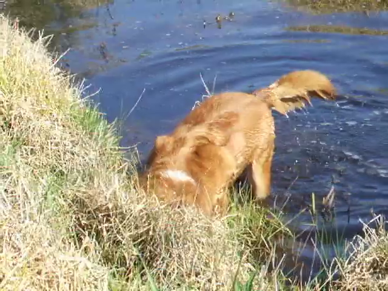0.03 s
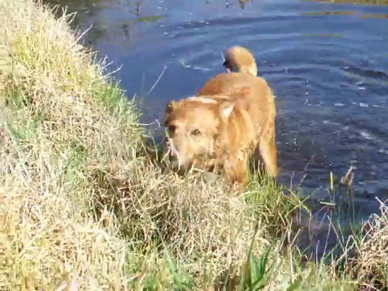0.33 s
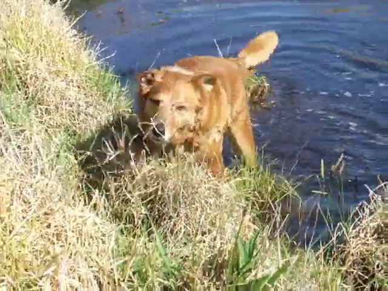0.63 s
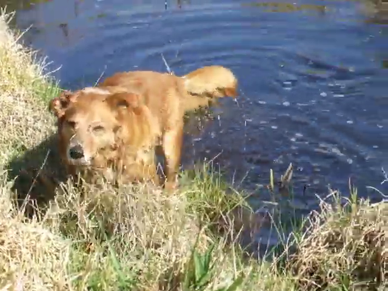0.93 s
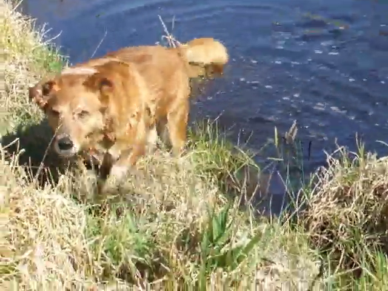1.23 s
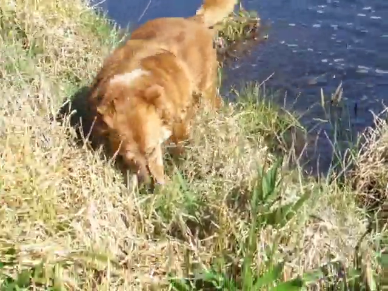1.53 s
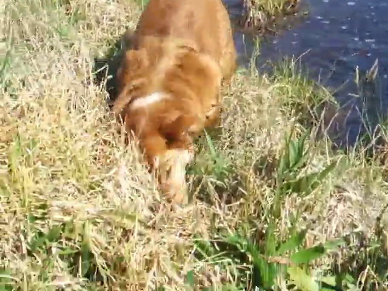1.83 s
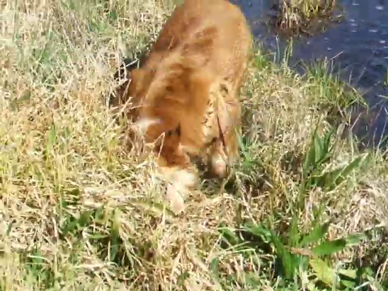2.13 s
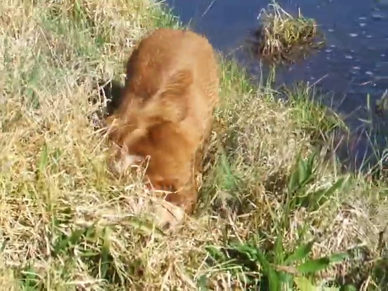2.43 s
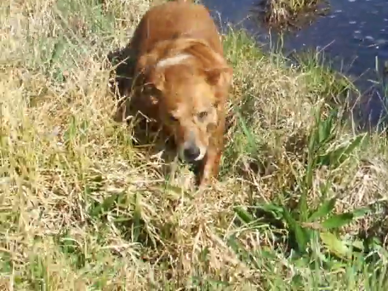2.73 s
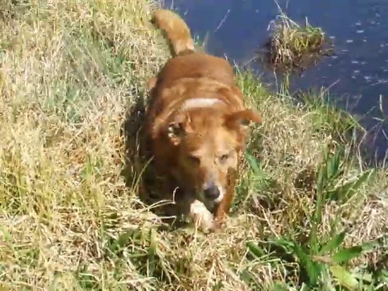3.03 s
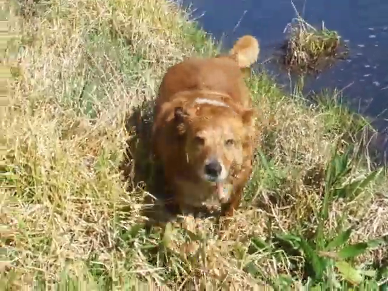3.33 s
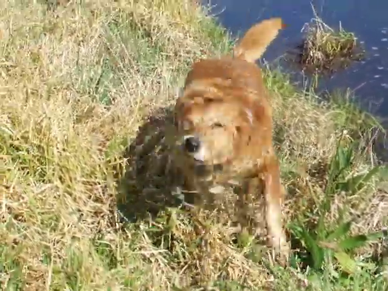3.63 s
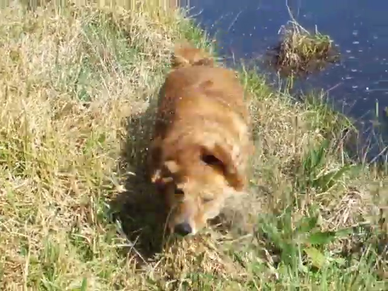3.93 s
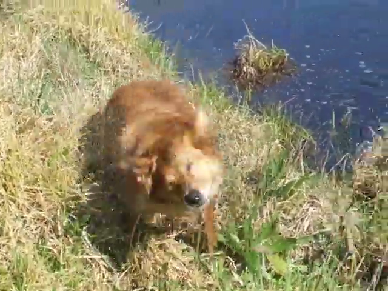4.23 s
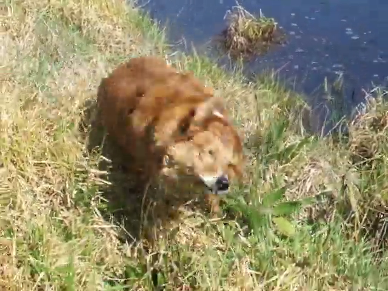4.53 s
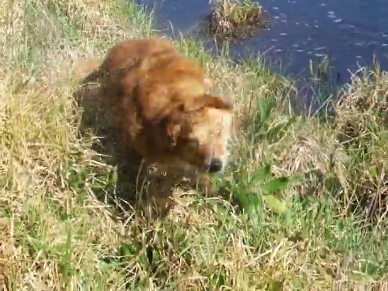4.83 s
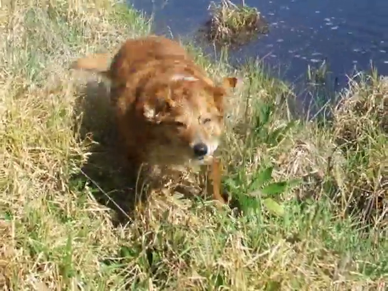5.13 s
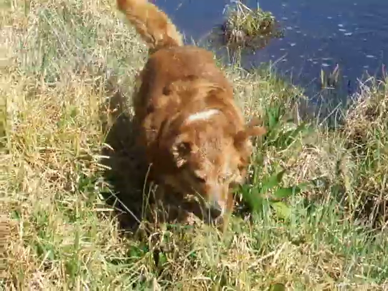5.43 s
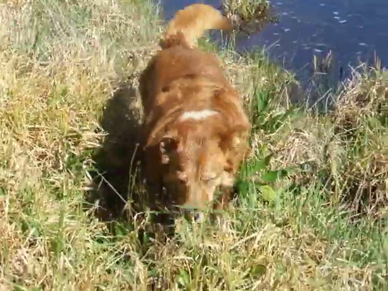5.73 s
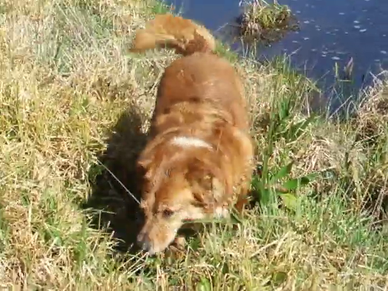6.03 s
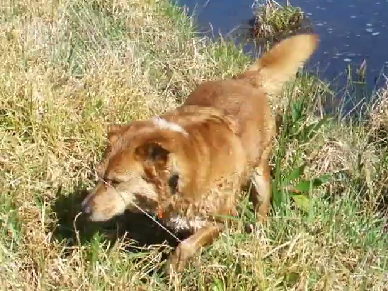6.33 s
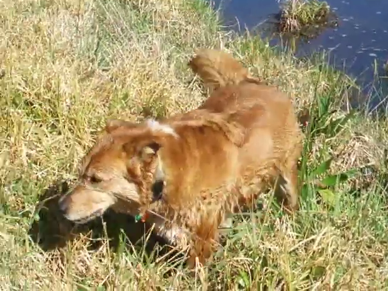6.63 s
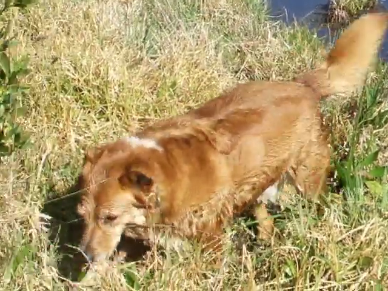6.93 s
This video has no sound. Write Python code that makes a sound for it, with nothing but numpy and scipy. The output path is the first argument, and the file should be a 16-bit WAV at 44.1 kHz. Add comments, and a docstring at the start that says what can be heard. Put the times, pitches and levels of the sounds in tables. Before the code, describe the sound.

A wet dog sloshes out of a pond, rustles through dry grass and shakes itself with rapid ear slaps while frogs call.

```python
"""A breeze, far traffic, a motor and a camera's faint whine lie under a pond where frogs call throughout.
First a wet dog sloshes out of the water and pushes through dry grass, snapping stalks; a far bird warbles.
From about 3.5 seconds it shakes itself: an ear slaps about five times a second, the other ear lands
in between amid smaller wet flaps, and spray falls on the grass.
Last, a tiny frog creaks three times as the dog moves on."""
import sys
import numpy as np
from scipy import signal
from scipy.fft import rfft, irfft
from scipy.io import wavfile
from scipy.ndimage import uniform_filter1d

SR = 44100
rng = np.random.default_rng(int(sys.argv[2]) if len(sys.argv) > 2 else 0)


def file_out(sig):
    """Save sig as 16-bit WAV at sys.argv[1]."""
    # one column per channel
    cols = np.atleast_2d(sig).T
    # limit, then scale
    lim = np.clip(cols, -1, 1)
    pcm = np.round(lim * 32767).astype(np.int16)
    wavfile.write(sys.argv[1], SR, pcm)


N = 316638
TIME = np.arange(N) / SR
FIRST_TWIST_S = 3.55

# The tone of rustling grass. Each row: frequency in Hz, level in dB.
GRASS_TONE = [(250, -24.5), (600, -15.5), (1200, -10.5), (2100, -0.5), (2700, -2), (3500, 1), (4500, 2.5),
              (6300, 2.5), (8000, -4.5)]
# The tone of a sharp crack. Each row: frequency in Hz, level in dB.
CRACK_TONE = [(600, -23.5), (1400, -24.5), (2200, 2), (3500, 10), (5000, -3.5), (7000, 5.5), (8200, -4.5)]
# Ear slaps. Each row: start in seconds, level in dB, pitch of the trapped air in Hz, delay of the
# ear tip in seconds, tip and water crack in dB against the slap, level of the flaps after it in dB.
EAR_SLAPS = [(3.6379, -26.5, 1780, 0.00187, 0.5, -19, -30.5), (3.804, -20, 2020, 0.00084, -2.5, -7.5, -40),
             (3.9959, -20, 1980, .0016, -12, -8, -30), (4.1826, -16.5, 2140, 0.0012, -6.5, -25, -24),
             (4.3678, -24.5, 1810, .0016, -8, -7, -34), (4.556, -24.5, 2300, .0014, -24, -7.5, -28.5),
             (4.7385, -14.5, 1950, 0.000974, -6, -12.5, -30), (4.9124, -17.5, 2020, .0023, 1, -9, -34.5),
             (5.0982, -17, 1850, 0.0048, -6.5, -28, -52)]


def undb(db):
    """Turn decibels into a number to multiply by."""
    return 10 ** (np.asarray(db) / 20)


def unit(x):
    """Scale a sound to an average strength (rms) of 1."""
    return x / np.sqrt(np.mean(x ** 2))


def curve(rows):
    """Join (seconds, value) rows by straight lines."""
    return np.interp(TIME, *np.transpose(rows))


def colour(x, points):
    """Shape a sound's tone by (Hz, dB) rows, at strength 1."""
    hz, db = np.transpose(points)
    bins = np.maximum(np.fft.rfftfreq(len(x), 1 / SR), 1)
    gain = undb(np.interp(np.log(bins), np.log(hz), db))
    return unit(irfft(rfft(x) * gain, len(x)))


def walk(rate):
    """Smooth wandering of strength 1, through `rate` random values a second."""
    k = max(int(SR / rate), 1)
    steps = np.repeat(rng.standard_normal(N // k + 1), k)
    return unit(uniform_filter1d(uniform_filter1d(steps, k), k)[:N])


def add(out, s, x):
    """Mix a short sound in at s seconds."""
    i = int(np.clip(s * SR, 0, N - 1))
    out[i:i + len(x)] += x[:N - i]


def fade(t60):
    """A fade, a fifth of a second long, that drops 60 dB every t60 seconds."""
    return np.exp(-np.log(1000) * TIME[:SR // 5] / t60)


def ring(hz, modes):
    """Tones dying away after one blow, from (multiple of the pitch, dB, fade time) rows."""
    t = TIME[:SR // 5]
    return sum(undb(db) * fade(t60) * np.sin(2 * np.pi * hz * ratio * t) for ratio, db, t60 in modes)


def crackle(rate, spread_db):
    """About `rate` random clicks a second, mostly weak and a few strong."""
    size = undb(spread_db * np.minimum(rng.exponential(size=N), 5))
    return unit((rng.random(N) < rate / SR) * size * rng.choice([-1, 1], N))


def swells(rows):
    """Bell-shaped swells from (peak time, dB, length) rows."""
    return np.sqrt(sum(undb(db) ** 2 * np.exp(-np.minimum((2 * (TIME - s) / length) ** 2, 40))
                       for s, db, length in rows))


def air(level_db=-52):
    """Open air: a low rumble and soft hiss that waver a little."""
    # Each row: frequency in Hz, level in dB.
    air_tone = [(15, -32), (25, -3), (44, 1), (104, -0.5), (142, -5.5), (219, -20), (266, -16),
                (442, -20.5), (770, -14), (934, -18), (2070, -17), (2390, -29.5), (3360, -21.5),
                (6920, -20.5), (8000, -20), (10400, -47.5), (17600, -120)]
    return colour(rng.standard_normal(N), air_tone) * undb(level_db + walk(5.5))


def breeze():
    """Moving air makes a low rush that swells and eases."""
    # Each row: time in seconds, level in dB.
    strength = [(0.0, -48.5), (0.86, -50.5), (2.54, -47.5), (4.6, -46.5), (5.6, -50.5), (7.18, -50)]
    tone = [(20, -16.5), (60, -1), (160, -1.5), (228, -1), (265, -7.5), (480, -9.5), (1200, -9),
            (4000, -18.5)]
    return colour(rng.standard_normal(N), tone) * undb(curve(strength))


def traffic(gain_db=-3):
    """Far tyres blend into one soft roar."""
    # Each row: time in seconds, level in dB.
    loudness = [(0.0, -59.5), (2.0, -56), (3.3, -54.5), (4.2, -58), (5.52, -67.5), (7.18, -66.5)]
    tone = [(300, -30.5), (560, -11.5), (760, 0), (950, -12), (1300, -11.5), (3000, -39)]
    return colour(rng.standard_normal(N), tone) * undb(curve(loudness) + gain_db)


def motor(hz=96.9, level_db=-54.5):
    """A far motor hums unsteadily, fading out and in."""
    phase = 2 * np.pi * np.cumsum(hz + 1.61 * walk(20)) / SR
    flutter_db = 2.6 * walk(24)
    drift_db = curve([(0, 2), (1, 0), (2, -3), (4.5, -5.5), (5.3, -2.2), (7.18, -1.5)])
    return np.sqrt(2) * np.sin(phase) * undb(level_db + drift_db + flutter_db)


def whine():
    """A camera gives off four faint, high, steady tones."""
    # Each row: pitch in Hz, level in dB.
    tones = [(7852, -65), (7882, -66), (8118, -69), (8148, -70)]
    return sum(np.sqrt(2) * undb(db) * np.sin(2 * np.pi * hz * TIME) for hz, db in tones)


def chorus(level_db=-60, hz=3380, sharpness=5):
    """Many tiny frogs far away merge into a thin, flickering ring."""
    peak = signal.iirpeak(hz, sharpness, fs=SR)
    band = unit(signal.lfilter(*peak, signal.lfilter(*peak, rng.standard_normal(N))))
    drift_db = curve([(0, -9), (1.2, 1.5), (4.5, 0), (5.4, -4), (7.18, -11)])
    return band * undb(level_db + drift_db + 2 * walk(20))


def bird(hz=3180, waver_hz=110, blur_hz=130):
    """A bird's thin warble, blurred by distance."""
    # Each row: peak time in seconds, level in dB, length in seconds.
    notes = [(1.22, -46.5, 0.029), (1.3, -51, 0.051), (1.54, -53.5, 0.13)]
    pitch = hz + waver_hz * walk(35) + blur_hz * walk(600)
    return np.sqrt(2) * np.sin(2 * np.pi * np.cumsum(pitch) / SR) * swells(notes)


def froglet(low_hz=2790, high_hz=3055.5):
    """A tiny frog creaks: four soft-edged clicks a call ring its throat pouch."""
    # Each row: start in seconds, level in dB.
    calls = [(5.498, -34), (6.174, -35), (6.845, -33.5)]
    # Each value: seconds from the start of a call to a click.
    click_delays = [0, .034, .077, .106]
    pouch = ring(low_hz, [(1, 3, 0.012)]) + ring(high_hz, [(1, 0, 0.014)])
    click = pouch * (1 - fade(0.0092))
    out = np.zeros(N)
    for s, db in calls:
        for delay in click_delays:
            add(out, s + delay, undb(db) * click)
    return out


def frog(gain_db=3, lead_s=.005, length_s=0.021, jitter=.3, echo_db=-17, echo_t60=0.11):
    """Uneven throat pulses ring a frog's pouch with a hollow knock; the banks echo it weakly."""
    # Each row: time in seconds, level in dB, pitch in Hz.
    knocks = [(0.162, -39.5, 846), (0.405, -34, 870), (1.037, -37.5, 933), (1.121, -42, 963),
              (1.525, -38.5, 892), (1.748, -38.5, 885), (2.697, -33, 867), (3.297, -39, 896),
              (3.349, -42, 890), (3.993, -38, 895), (4.433, -37.5, 943), (4.923, -33, 875),
              (5.938, -39, 918), (6.047, -47, 926), (6.357, -40.5, 960), (6.496, -42, 894),
              (6.94, -36, 935)]
    # The pouch's tones. Each row: multiple of the pitch, level in dB, fade time in seconds.
    pouch_tones = [(.53, -15, .035), (1.002, 21.5, 0.019), (1.24, -3.5, 0.02), (2.1, -16.5, 0.009)]
    out = np.zeros(N)
    for s, db, hz in knocks:
        slip, rough_db = rng.standard_normal((24, 2)).T
        throat = np.zeros(SR // 5)
        for t, size in zip((np.arange(24) + jitter * slip) / hz, undb(rough_db)):
            throat[int(max(t, 0) * SR)] += size * np.sin(np.pi * np.clip(t / length_s, 0, 1))
        call = signal.fftconvolve(np.gradient(throat), ring(hz, pouch_tones))[:SR // 5]
        add(out, s - lead_s, undb(db + gain_db) * call / np.abs(call).max())
    banks = rng.standard_normal(SR // 5) * fade(echo_t60)
    return out + undb(echo_db) * signal.fftconvolve(out, banks / np.linalg.norm(banks))[:N]


def bubble(hz, t60, rise=2.0):
    """A bubble rings and rises in pitch as it surfaces."""
    t = TIME[:SR // 5]
    return fade(t60) * (1 - fade(0.0073)) * np.sin(2 * np.pi * hz * (t + rise * t ** 2 / 2))


def water(slosh_db=-2, fizz_db=-3, scatter_db=3):
    """Wading paws slosh and stir up small bubbles; a few louder drips stand out."""
    # Each row: frequency in Hz, level in dB.
    slosh_tone = [(400, -36), (900, -4.5), (1700, 0.5), (2400, -1.5), (3500, -3), (8000, -19)]
    # Paws in water and mud. Each row: peak time in seconds, level in dB, length in seconds.
    steps = [(0.199, -39.5, 0.00744), (0.293, -47, 0.12), (0.408, -46.5, 0.06), (.85, -48, 0.043),
             (0.964, -38, 0.011), (1.002, -36, 0.0071), (1.04, -44, 0.036), (1.133, -42.5, 0.062),
             (6.316, -46, 0.093)]
    # Each row: start in seconds, level in dB, starting pitch in Hz, fade time in seconds.
    drips = [(.018, -33, 3550, 0.086), (.09, -34, 2530, 0.022), (.195, -21.5, 1810, 0.0095),
             (.308, -37, 2330, .03), (1.016, -30, 2070, 0.018), (1.096, -29, 1750, 0.019),
             (2.34, -36, 1575, 0.071), (4.516, -36.5, 1620, 0.068), (5.099, -22.5, 4680, 0.033),
             (5.245, -31, 640, 0.015)]
    out = colour(crackle(rate=2000, spread_db=4), slosh_tone) * swells(steps) * undb(slosh_db)
    for s, db, length in steps:
        for when, pitch, size in rng.standard_normal((9, 3)):
            hz = 1900 * 2 ** (pitch / 2)
            pop = bubble(hz, t60=28 / hz)  # small, high bubbles die away sooner
            add(out, s + length * when / 3, undb(db + fizz_db + scatter_db * size) * pop)
    for s, db, hz, t60 in drips:
        add(out, s, undb(db) * bubble(hz, t60))
    return out


def pushes(bend_s=0.037, spring_back_s=0.041):
    """How hard the grass moves as legs and muzzle bend it, drag through and let it spring back."""
    # Grass stirring between pushes. Each row: time in seconds, level in dB.
    stirring = [(0, -51), (.55, -55.5), (1.2, -51), (3.0, -51.5), (5.1, -50.5), (6.1, -66), (6.7, -63),
                (7.18, -50)]
    # Each row: start in seconds, level in dB, length in seconds.
    shoves = [(0.107, -47, 0.23), (.63, -48, 0.18), (0.773, -44.5, .17), (1.0, -44, 0.037),
              (1.104, -43.5, 0.033), (1.19, -46.5, 0.14), (1.36, -45, 0.075), (1.495, -45.5, 0.13),
              (1.69, -46, 0.3), (1.924, -44, 0.16), (2.076, -40, 0.26), (2.36, -48, 0.31),
              (3.01, -45, 0.38), (3.56, -47, 0.32), (4.087, -46, 0.11), (5.532, -47, 0.15),
              (5.772, -46.5, 0.12), (5.886, -45.5, 0.053), (6.246, -50.5, 0.19), (6.52, -53.5, 0.061),
              (6.738, -42.5, 0.04), (6.89, -45.5, .17)]
    power = undb(curve(stirring)) ** 2
    for s, db, length in shoves:
        bend = np.clip((TIME - s) / bend_s, 0, 1)
        settle = np.exp(-np.maximum(TIME - s - length, 0) / spring_back_s)
        power += (undb(db) * bend * settle) ** 2
    return np.sqrt(power)


def shake_db():
    """How hard the dog shakes at each moment, in dB."""
    # Each row: time in seconds, level in dB.
    effort = [(3.45, -13), (3.6, -10.5), (3.87, 2.5), (4.05, -2), (4.55, -3), (5.04, -1.5), (5.35, -15),
              (5.45, -38)]
    return curve(effort)


def twists(per_second=5.98, depth_db=16.5):
    """How much spray flies: each twist of the body throws a wave, bigger when the shake is harder."""
    turn = np.cos(2 * np.pi * per_second * (TIME - FIRST_TWIST_S))
    return undb(shake_db() + depth_db * (turn - 1) / 2)


def sweeps(sharpness=1.8, broad_db=-12):
    """Coat and paws sweep over many blades at once, making a short, bright hiss."""
    # Each row: peak time in seconds, level in dB, length in seconds, strongest frequency in Hz.
    swishes = [(1.003, -34, 0.0061, 3330), (1.012, -41, 0.016, 6200), (2.288, -45.5, .08, 3800),
               (3.174, -41, 0.042, 3330), (3.18, -40, 0.046, 5800), (3.33, -44, .04, 4640),
               (4.225, -41.5, 0.045, 6200), (4.75, -37, 0.016, 6960), (5.343, -41, 0.022, 5270),
               (6.3, -55, 0.067, 2267), (6.385, -39, 0.027, 4760), (7.049, -40.5, 0.032, 7700)]
    ticks, out = crackle(rate=15000, spread_db=1), np.zeros(N)
    t = TIME[:SR // 2]
    for s, db, length, hz in swishes:
        piece = ticks[rng.integers(N - len(t)):][:len(t)]
        peak = signal.iirpeak(hz, sharpness, fs=SR)
        bright = signal.lfilter(*peak, signal.lfilter(*peak, piece))
        hiss = unit(unit(bright) + undb(broad_db) * colour(piece, GRASS_TONE))
        swell = np.exp(-2 * ((t - t.mean()) / length) ** 2)
        add(out, s - t.mean(), undb(db) * hiss * swell)
    return out


def grass(spray_db=-43, swish_db=-1, tick_db=-8):
    """Dry blades brush together as the dog moves or sprays them; stiffer ones tick singly."""
    blades = colour(crackle(rate=8000, spread_db=2.5), GRASS_TONE) * undb(walk(60))
    ticks = colour(crackle(rate=130, spread_db=2.5), CRACK_TONE) * undb(tick_db)
    motion = np.hypot(pushes(), twists() * undb(spray_db))
    return (blades + ticks) * motion + sweeps() * undb(swish_db)


def stalks(gain_db=-2, t60=0.017, broad_db=-4, sharpness=3.4):
    """Each stalk that breaks under a paw gives a short crack with its own ring."""
    # Each row: start in seconds, level in dB, pitch of the ring in Hz.
    snaps = [(0.1366, -36, 4980), (0.9986, -27, 3380), (1.0082, -27, 6240), (1.867, -29.5, 4100),
             (2.858, -29, 3550), (3.2142, -23, 5670), (4.229, -26.5, 6300), (4.6876, -29, 5850),
             (5.4577, -35, 3310), (5.5514, -31.5, 3100), (6.323, -41, 5170), (7.051, -33, 3500)]
    out = np.zeros(N)
    for s, db, hz in snaps:
        fibres = rng.standard_normal(SR // 5)
        body = unit(signal.lfilter(*signal.iirpeak(hz, sharpness, fs=SR), fibres))
        crack = unit(body + undb(broad_db) * colour(fibres, CRACK_TONE))
        add(out, s, undb(db + gain_db) * fade(t60) * crack)
    return out


def coat(spatter_db=-54, drip_db=-56):
    """The soaked coat spatters softly during the shake and drips on afterwards."""
    loudness = undb(shake_db() + spatter_db) + undb(drip_db) * (TIME > FIRST_TWIST_S)
    tone = [(600, -8.5), (1300, -13), (1750, -4.5), (2400, -8), (3300, -7), (6000, -10.5)]
    return colour(crackle(rate=1500, spread_db=3.5), tone) * loudness


def smack(contacts, crack_t60, spray_db, spray_t60, low_hz):
    """Wet skin meets wet fur: trapped air rings, the film of water cracks and droplets fly."""
    # The trapped air's tones. Each row: multiple of the pitch, level in dB, fade time in seconds.
    pocket_tones = [(1, 1.5, .009), (1.12, -13, 0.011), (1.32, -5, .006), (1.72, -13.5, .005),
                    (2.45, -20, .005), (3.6, -19, 0.0063)]
    pops, splash = np.zeros(N), np.zeros(N)
    for s, db, hz, crack_db in contacts:
        add(pops, s, undb(db) * ring(hz, pocket_tones))
        add(splash, s, undb(db) * (undb(crack_db) * fade(crack_t60) + undb(spray_db) * fade(spray_t60)))
    # so small a source gives off almost no bass
    bass_cut = signal.butter(5, low_hz, "high", fs=SR, output="sos")
    return signal.sosfilt(bass_cut, pops + splash * colour(rng.standard_normal(N), CRACK_TONE))


def flaps(gain_db=-1, hz=2080, pitch_spread=0.073, smear_s=0.004, softer_db=-8, crack_db=-13):
    """After each ear slap the other ear lands, amid smaller wet flaps; each is three quick touches."""
    # Each row: usual delay after the slap in seconds, level change in dB, level cap in dB.
    landings = [(0.033, -3, -36), (.068, -0.5, -24), (.099, -7, -36), (.137, -8, -35.5)]
    quicken_per_s = .11  # the flaps follow sooner as the shake goes on
    contacts, middle_s = [], np.mean([row[0] for row in EAR_SLAPS])
    for s, *_, db in EAR_SLAPS:
        for lag, change_db, cap_db in landings:
            when = s + lag * (1 - quicken_per_s * (s - middle_s))
            size_db = min(db + change_db, cap_db) + gain_db
            tones = hz * (1 + pitch_spread * rng.standard_normal(3))
            contacts.append((when, size_db, tones[0], crack_db))
            for tone in tones[1:]:
                contacts.append((when + smear_s * rng.random(), size_db + softer_db, tone, crack_db))
    return smack(contacts, crack_t60=0.013, spray_db=-28.5, spray_t60=0.043, low_hz=1450)


def ears(brush_s=0.00225, brush_db=-20):
    """At each slap an ear brushes the fur, then lands in two stages, its tip after its base."""
    contacts = []
    for s, db, hz, tip_delay, tip_db, crack_db, _ in EAR_SLAPS:
        for lag, stage_db in (-brush_s, brush_db), (0, 0), (tip_delay, tip_db):
            contacts.append((s + lag, db + stage_db, hz, crack_db))
    return smack(contacts, crack_t60=.01, spray_db=-28, spray_t60=.07, low_hz=1720)


def scene():
    """The dog, the pond and the background, mixed into one channel."""
    dog = grass() + stalks() + ears() + flaps() + coat() + water()
    pond = frog() + froglet() + chorus() + bird()
    background = air() + breeze() + traffic() + motor() + whine()
    return (dog + pond + background)[None]


def record(dry, top_hz=8350):
    """The small camera cuts off the highest treble."""
    treble_cut = signal.firwin(141, top_hz, window=("kaiser", 7), fs=SR)
    return signal.fftconvolve(dry, treble_cut[None], mode="same")


dry = scene()
out = record(dry)
file_out(out)
```